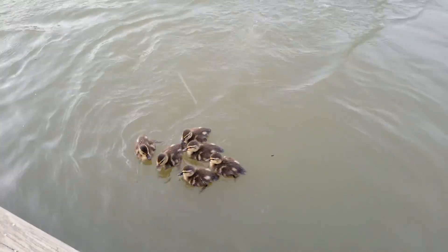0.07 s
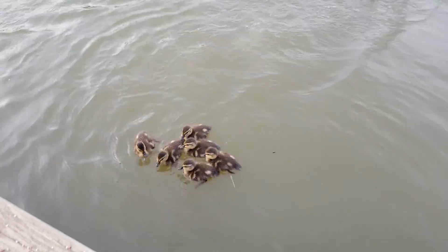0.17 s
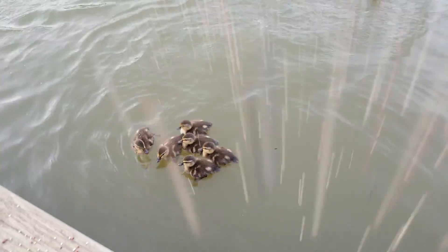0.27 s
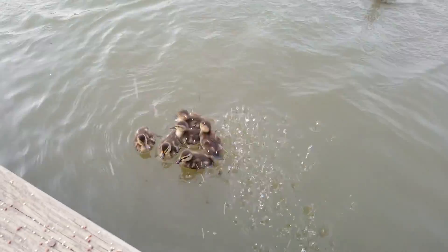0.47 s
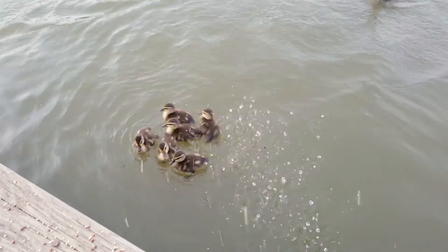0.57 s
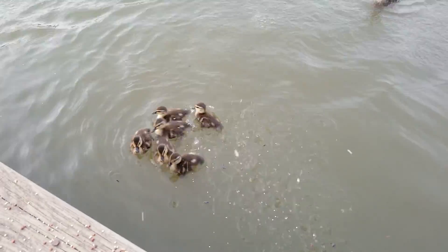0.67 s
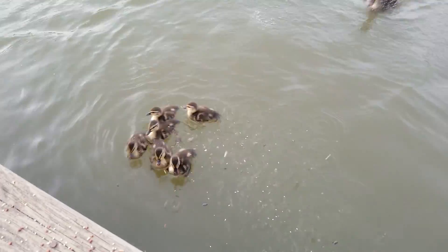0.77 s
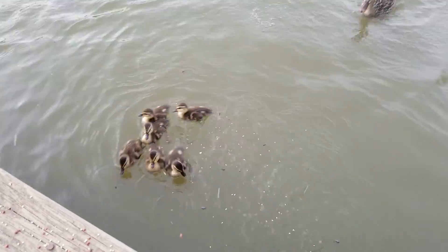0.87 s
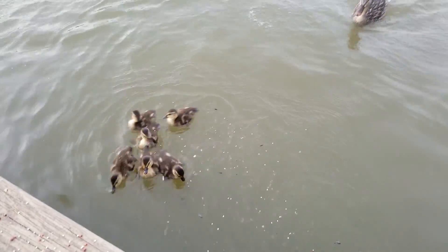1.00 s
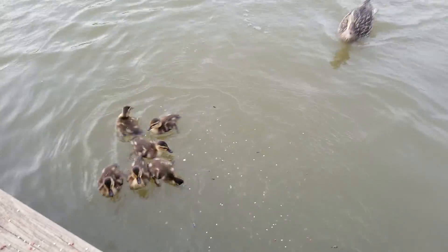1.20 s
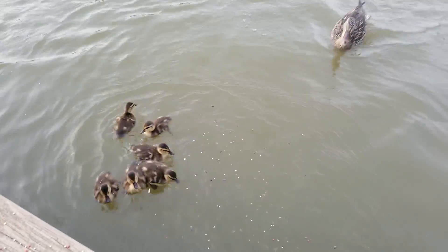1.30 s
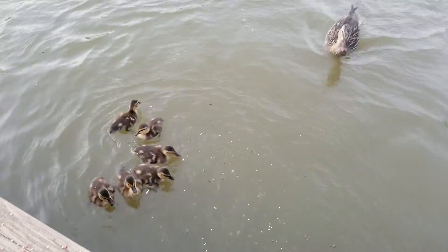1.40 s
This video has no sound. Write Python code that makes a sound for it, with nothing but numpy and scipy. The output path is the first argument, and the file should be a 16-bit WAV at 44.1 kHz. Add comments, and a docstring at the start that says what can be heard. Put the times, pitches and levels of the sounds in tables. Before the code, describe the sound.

Thrown feed pellets rap on the microphone, then patter onto pond water as ducklings peep faintly.

```python
"""Feed pellets, thrown to ducklings from a dock, rap on the microphone's housing and excite the
resonances of its ports, shell and body. The rest showers onto the pond as a patter of small impacts,
with single drops and trapped bubbles that ring as damped oscillators. Ducklings peep and a duck
clucks softly in harmonic tones, while water gurgles and laps under a light breeze."""
import sys
import numpy as np
from scipy import signal
from scipy.fft import rfft, irfft, next_fast_len
from scipy.io import wavfile

SR = 44100
rng = np.random.default_rng(int(sys.argv[2]) if len(sys.argv) > 2 else 0)


def to_wav(sig):
    """Store sig (one row per channel, or 1-D mono) as 16-bit WAV at the path in sys.argv[1].

    Samples outside -1..1 are clipped; the rate is SR.
    """
    pcm = np.clip(np.atleast_2d(sig), -1, 1) * 32767
    pcm = np.round(pcm).astype(np.int16)
    wavfile.write(sys.argv[1], SR, pcm.T)  # frames by channels


N = 63945
T = np.arange(N) / SR
WATER_CORRELATION = .35  # between the two channels

# spectrum of a splash: frequency_hz, level_db
SPLASH = [(290, -45.5), (500, -24.5), (1260, -11), (1840, -6), (3490, -8.5), (5880, -6), (7750, -16.5),
          (10500, -1), (16000, -21)]


def from_db(db):
    """Decibels to amplitude ratio."""
    return 10 ** (np.asarray(db) / 20)


def rms_one(x):
    """Normalisation to rms 1."""
    return x / np.sqrt(np.mean(x ** 2) + 1e-20)


def in_time(rows):
    """Linear interpolation of each column of a time curve at every sample."""
    time_s, *columns = np.transpose(rows)
    return [np.interp(T, time_s, column) for column in columns]


def at_hz(spectrum, hz):
    """Interpolation of a spectrum on a log-frequency axis."""
    frequency_hz, level_db = np.transpose(spectrum)
    return np.interp(np.log(hz + 1), np.log(frequency_hz), level_db)


def colour(x, spectrum):
    """Minimum-phase filtering at unit power: a source spectrum times each port's response."""
    # responses of the left and right microphone ports, each: frequency_hz, gain_db
    port_responses = [
        [(2000, 0.5), (4500, 1), (6400, 11), (7600, 2.5), (10300, 4), (13000, 1)],
        [(2000, 2), (4500, 9), (6400, 5.5), (7600, 5.5), (10300, -8.5), (13000, 4)],
    ]
    size = 2 * next_fast_len(N)
    hz = np.fft.rfftfreq(size, 1 / SR)
    gain = rms_one(from_db([at_hz(spectrum, hz) + at_hz(port, hz) for port in port_responses]))
    cepstrum = irfft(np.log(gain + 1e-9))
    causal_fold = np.r_[1, np.full(size // 2 - 1, 2), 1, np.zeros(size // 2 - 1)]
    return irfft(rfft(x, size) * np.exp(rfft(cepstrum * causal_fold)))[:, :N]


def butterworth(x, hz, kind):
    """Maximally flat filtering."""
    return signal.sosfilt(signal.butter(2, hz, kind, fs=SR, output="sos"), x)


def noise(correlation):
    """Partly correlated stereo white noise, mixed from mid and side signals."""
    mid, side = rng.standard_normal((2, N))
    return (np.sqrt(1 + correlation) * mid + np.sqrt(1 - correlation) * side * [[1], [-1]]) / np.sqrt(2)


def clicks(start_s, db):
    """One impulse at each given time."""
    out = np.zeros(N)
    np.add.at(out, np.clip(np.atleast_1d(start_s) * SR, 0, N - 1).astype(int), from_db(db))
    return out


def ring(x, hz, t60_s):
    """Damped oscillator: a unit impulse starts a decaying sine of amplitude 1."""
    radius, angle = from_db(-60 / (t60_s * SR)), 2 * np.pi * hz / SR
    return signal.lfilter([0, np.sin(angle)], [1, -2 * radius * np.cos(angle), radius ** 2], x + 1e-18)


def fade(x, decay_s):
    """Leaky integration: each impulse becomes an exponential decay."""
    return signal.lfilter([1], [1, -np.exp(-1 / (decay_s * SR))], x + 1e-18)


def waver(smoothing_s=.0015):
    """Quick random modulation: twice-smoothed noise of rms 1."""
    return rms_one(fade(fade(rng.standard_normal(N), smoothing_s), smoothing_s))


def struck(start_s, db, modes, spread_s, lag_cycles, right_lag_cycles=.2):
    """Modal superposition: blows reach each mode and channel with their own delay and strength."""
    out = np.zeros((2, N))
    for channel, cycles in enumerate([lag_cycles, lag_cycles + right_lag_cycles]):
        for k, (hz, mode_db, t60_s) in enumerate(modes):
            arrival_s = start_s + cycles / hz + spread_s * rng.random(len(start_s))
            blows = clicks(arrival_s, db + mode_db + rng.standard_normal(len(start_s)))
            out[channel] += (-1) ** k * ring(blows, hz, t60_s)
    return out


def breeze():
    """Wind noise: air flowing over the ports makes a low rumble."""
    # strength of the rumble: time_s, level_db
    envelope = [(0.0, -47.5), (0.2, -41), (0.37, -55.5), (1.45, -59.5)]
    # spectrum of the rumble: frequency_hz, level_db
    spectrum = [(25, -21), (80, -4), (146, -6), (250, -15.5), (500, -38), (1100, -92)]
    db, = in_time(envelope)
    return from_db(db) * rms_one(colour(noise(correlation=.2), spectrum))


def ripples():
    """Incoherent summation: many ripples merge into a wash of broadband noise."""
    # strength of the wash: time_s, level_db
    envelope = [(0, -50), (0.2, -52), (0.36, -61.5), (0.7, -66), (1.45, -70.5)]
    # spectrum of the wash: frequency_hz, level_db
    spectrum = [(300, -12.5), (900, -1), (1400, -6.5), (2200, -1.5), (3400, -11.5), (6400, -6), (7300, -31),
                (10000, -7.5), (16000, -26)]
    db, = in_time(envelope)
    return from_db(db) * rms_one(colour(noise(WATER_CORRELATION), spectrum))


def gurgles(wobble_depth=.016):
    """Frequency glide: each gurgle swells and fades while its unsteady pitch climbs ever faster."""
    # faint gurgles of the water: start_s, length_s, start_hz, end_hz, level_db
    glides = [(0.047, 0.09, 700, 1006, -56), (0.164, 0.04, 530, 910, -54.5), (1.131, 0.043, 620, 1300, -57)]
    out = np.zeros(N)
    wobble = 1 + wobble_depth * waver()
    for start_s, length_s, start_hz, end_hz, db in glides:
        progress = np.clip((T - start_s) / length_s, 0, 1)
        hz = wobble * (start_hz + (end_hz - start_hz) * progress ** 2)
        swell = 2 * np.sqrt(progress * (1 - progress))
        out += from_db(db) * swell * np.sin(2 * np.pi * np.cumsum(hz) / SR)
    return out


def bubbles(relative_rise_per_s=.96, attack_s=.00032):
    """Bubble resonance: larger bubbles ring down, rising in pitch as they near the surface."""
    # bubbles left by the feed and the birds: start_s, pitch_hz, level_db, t60_s
    resonances = [(0.049, 1662, -40, 0.029), (0.438, 2020, -31.5, 0.026), (0.455, 1807, -37, 0.17),
                  (0.464, 1400, -26.5, 0.019), (0.535, 780, -46.5, 0.06), (0.577, 956, -39, 0.062),
                  (1.12, 1650, -50, 0.028)]
    out = np.zeros((2, N))
    for start_s, hz, db, t60_s in resonances:
        age_s = np.maximum(T - start_s, 0)
        phase = 2 * np.pi * hz * (age_s + relative_rise_per_s * age_s ** 2 / 2)
        envelope = from_db(db - 60 * age_s / t60_s) * (1 - np.exp(-age_s / attack_s))
        out += envelope * np.sin(phase)
    return out


def drops(plip_range_hz=(1700, 2600), plip_gain_db=-13):
    """Impact and air entrainment: each drop makes a sharp splash, then the plip of a small bubble."""
    # single drops and clumps landing: start_s, level_db, decay_s
    landings = [(0.054, -35, 0.0028), (0.4166, -39.5, .002), (0.4299, -26.5, 0.0044), (0.468, -34, 0.0053),
                (0.4715, -37, .0015), (0.488, -31.5, 0.002), (0.51, -36, .002), (0.599, -38.5, 0.0057),
                (0.605, -36, 0.003), (0.6703, -35.5, 0.0031), (0.76, -44, 0.0032), (0.793, -43, 0.0046),
                (0.804, -41, 0.00264), (0.921, -45.5, 0.0027), (0.965, -52, 0.0029), (1.095, -45.5, 0.0023),
                (1.136, -41, 0.0022), (1.177, -39, 0.00136)]
    envelope = sum(fade(clicks(start_s, db), decay_s) for start_s, db, decay_s in landings)
    pitches_hz = rng.uniform(*plip_range_hz, len(landings))
    plips = sum(ring(clicks(start_s + decay_s, db + plip_gain_db), hz, t60_s=.035)
                for (start_s, db, decay_s), hz in zip(landings, pitches_hz))
    return colour(envelope * noise(WATER_CORRELATION), SPLASH) + plips


def ducklings(wobble_depth=.008, shimmer_rms_db=2, overtone_db=-20):
    """Jitter and shimmer: a small throat's thin whistle wavers along a parabola of pitch."""
    # duckling peeps: start_s, length_s, start_hz, middle_hz, end_hz, level_db
    peeps = [(0.083, 0.043, 2750, 3260, 2830, -45.5), (0.634, 0.023, 2720, 2500, 2120, -64),
             (0.687, 0.074, 2640, 2636, 2360, -66), (1.019, 0.076, 2600, 2670, 2555, -58.5),
             (1.112, 0.0224, 3076, 2590, 2400, -61), (1.121, 0.12, 2570, 2415, 2523, -59)]
    out = np.zeros((2, N))
    wobble = 1 + wobble_depth * waver()
    shimmer_db = shimmer_rms_db * waver()
    for start_s, length_s, *pitches_hz, db in peeps:
        progress = np.clip((T - start_s) / length_s, 0, 1)
        hz = wobble * np.polyval(np.polyfit([0, .5, 1], pitches_hz, 2), progress)
        phase = 2 * np.pi * np.cumsum(hz) / SR
        whistle = np.sin(phase) + from_db(overtone_db) * np.sin(2 * phase)
        swell = 2 * np.sqrt(progress * (1 - progress))
        out += from_db(db + shimmer_db) * swell * whistle
    return out


def port_ticks(start_s, db, modes, rise_s=.00022, scuff_db=-14, rattle_db=-38):
    """Impulse response: a hard click, a brief scuff and a faint rattle excite a port's resonances."""
    hits = clicks(start_s, db)
    scuff = from_db(scuff_db) * fade(hits, decay_s=.0005)
    rattle = from_db(rattle_db) * fade(hits, decay_s=.003)
    contact = hits + rng.standard_normal(N) * (scuff + rattle)
    # each resonance acts twice, so a click swells for rise_s and dies quickly
    t60_s = np.log(1000) * rise_s
    unit_peak = 2 * np.e / (rise_s * SR)
    return unit_peak * sum(from_db(gain_db) * ring(ring(contact, hz, t60_s), hz, t60_s)
                           for hz, gain_db in modes)


def shell_knocks(start_s, db, pitch_hz, chatter_db=5.5, chatter_band_hz=(600, 4800)):
    """Free vibration: the shell rings at a pitch set by where a pellet lands, and chatters briefly."""
    knocks = sum(ring(clicks(s, level), hz, t60_s=.015) for s, level, hz in zip(start_s, db, pitch_hz))
    envelope = fade(clicks(start_s, db + chatter_db), decay_s=.003)
    chatter = butterworth(envelope * noise(0), chatter_band_hz, "band")
    return from_db([[-5], [-1]]) * (knocks + chatter)  # louder on the right


def pellets(body_t60_s=.053, low_cut_hz=118, jolt_hz=116):
    """Impact excitation: pellets tick in the ports, knock the shell and thud through the body."""
    # pellets on the housing: start_s, left_tick_db, right_tick_db, knock_db, knock_hz, thud_db
    impacts = [(0.2164, 0.5, -7.5, -15.5, 3280, -18), (0.2479, -18, -4, -8, 2150, -22),
               (0.2535, -7, -7, -16.5, 4300, -42.5), (0.2615, -3, -17.5, -31, 1400, -46.5),
               (0.2656, -13.5, -14.5, -29.5, 4300, -41.5), (0.2691, 4, -1, -13, 4500, -45.5),
               (0.2743, -6.5, -7, -14, 830, -22.5), (0.2923, -0.5, -2.5, -22.5, 360, -31.5),
               (0.2942, -4, -14, -23, 380, -42.5), (0.304, -11.5, -29, -28, 1500, -58.5),
               (0.309, -8.5, -10.5, -11, 1450, -15.5), (0.3238, -3, -42, -29, 1500, -37.5)]
    # resonances of the left and right microphone ports: frequency_hz, gain_db
    left_port = [(1450, -11.5), (6200, -13), (10400, -0.5), (14000, -26.5)]
    right_port = [(4250, -20.5), (5700, -4), (9800, -14.5), (12400, -15)]
    # modes of the housing's body: frequency_hz, gain_db
    body = [(150, -20.5), (246, 2.5), (338, -12), (425, -5.5), (550, -7.5), (655, -3), (782, -4.5),
            (890, -8.5), (1330, -13.5), (2120, -14.5)]
    start_s, left_db, right_db, knock_db, knock_hz, thud_db = np.transpose(impacts)
    ticks = np.array([port_ticks(start_s, left_db, left_port), port_ticks(start_s, right_db, right_port)])
    knocks = shell_knocks(start_s, knock_db, knock_hz)
    modes = [(hz, db, body_t60_s) for hz, db in body]
    # dispersion: low modes travel slower and arrive later
    thuds = struck(start_s, thud_db, modes, spread_s=.0012, lag_cycles=.85)
    # the heaviest pellet jolts the whole housing
    jolt = ring(clicks(start_s=.3125, db=-13.5), jolt_hz, t60_s=.016)
    raps = butterworth(ticks + knocks + thuds, low_cut_hz, "high")
    return raps + butterworth(jolt, jolt_hz / 2, "high")


def grains(per_s, spread_db=5):
    """Shot noise: stereo clicks of uneven size arrive at random."""
    sizes = from_db(spread_db * np.minimum(rng.exponential(1, N), 3))
    return (rng.random(N) < per_s / SR) * sizes * noise(WATER_CORRELATION)


def shower(peak_grains_per_s=6000, peak_plips_per_pitch_per_s=60, fizz_db=-5):
    """Random impacts: feed patters on the water, denser when louder, and traps tiny ringing bubbles."""
    # strength of the patter: time_s, level_db
    envelope = [(0.36, -61.5), (0.425, -59.5), (0.436, -45), (0.485, -37.5), (0.512, -45), (0.525, -52.5),
                (0.57, -58), (0.62, -56), (0.85, -62.5), (1.3, -69.5)]
    db, = in_time(envelope)
    density = np.sqrt(from_db(db - db.max()))
    impacts = grains(peak_grains_per_s * density)
    patter = rms_one(colour(impacts / np.sqrt(density), SPLASH))
    plips = sum(ring(grains(peak_plips_per_pitch_per_s * density), hz, t60_s=44 / hz)
                for hz in np.geomspace(950, 5200, 24))
    fizz = rms_one(plips / np.sqrt(density))
    return from_db(db) * (patter + from_db(fizz_db) * fizz)


def laps():
    """Damped resonance: wavelets slap hollowly under the dock."""
    # wavelets striking the dock: start_s, level_db
    slaps = [(0.635, -40), (1.138, -45.5), (1.396, -45.5)]
    # hollow modes under the dock: frequency_hz, gain_db, t60_s
    modes = [(95.9, 2, 0.057), (255, 10.5, 0.0054), (646, -3, 0.012)]
    start_s, db = np.transpose(slaps)
    return struck(start_s, db, modes, spread_s=.00064, lag_cycles=.31)


def duck(jitter_depth=.07):
    """Harmonic series: a soft, low cluck falls in pitch, roughened by jitter."""
    # course of the cluck: time_s, pitch_hz, level_db
    cluck = [(1.173, 336.7, -67), (1.205, 276.7, -54.5), (1.228, 248, -61), (1.243, 255.7, -83)]
    # harmonics from the fundamental up: gain_db
    harmonics = [4, -1.5, 7, 4, -11, -15]
    hz, db = in_time(cluck)
    jitter = jitter_depth * rms_one(fade(rng.standard_normal(N), decay_s=.0024))
    phase = 2 * np.pi * np.cumsum(hz * (1 + jitter)) / SR
    sounding = (T > cluck[0][0]) & (T < cluck[-1][0])
    return sounding * sum(from_db(db + gain_db) * np.sin(k * phase)
                          for k, gain_db in enumerate(harmonics, start=1))


def scene(right_lag_s=.00043):
    """Superposition at the microphone: sound from the water reaches the right port a little later."""
    water = shower() + drops() + bubbles() + gurgles() + laps()
    left, right = water + ducklings() + duck() + breeze() + ripples()
    return pellets() + np.array([left, np.interp(T - right_lag_s, T, right)])


def record(dry, ceiling=.85, stopband_hz=17200):
    """Saturation and band limiting: the loudest ticks overload softly, and the top treble is cut."""
    saturated = ceiling * np.tanh(dry / ceiling)
    return signal.sosfilt(signal.cheby2(12, 70, stopband_hz, fs=SR, output="sos"), saturated)


dry = scene()
out = record(dry)
to_wav(out)
```